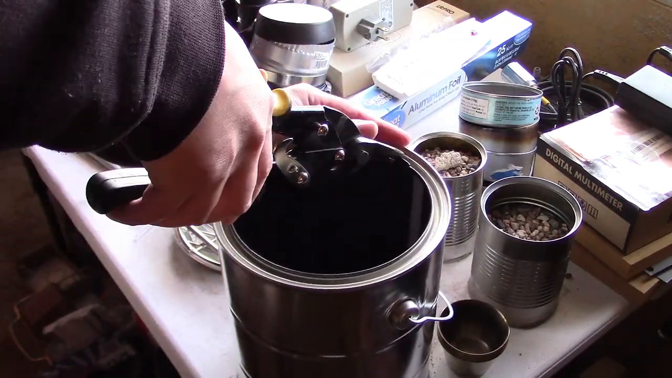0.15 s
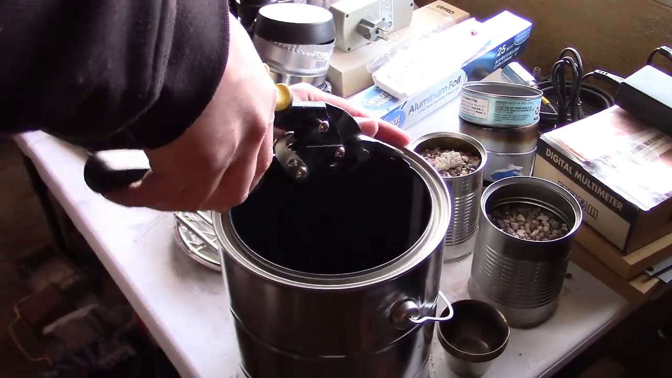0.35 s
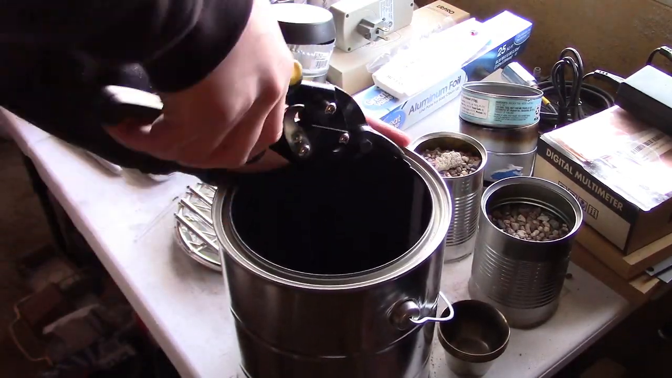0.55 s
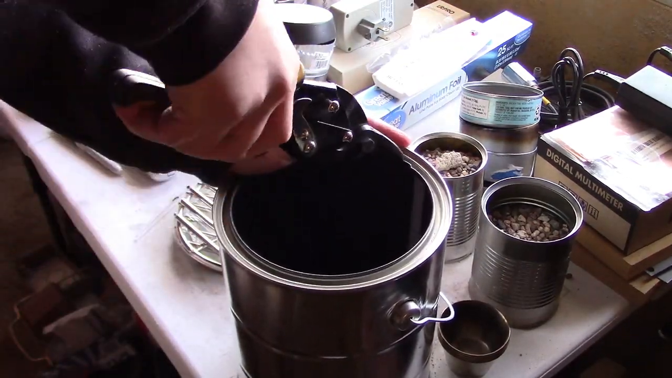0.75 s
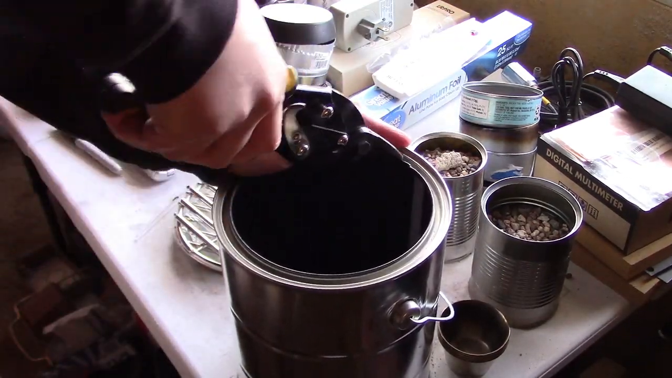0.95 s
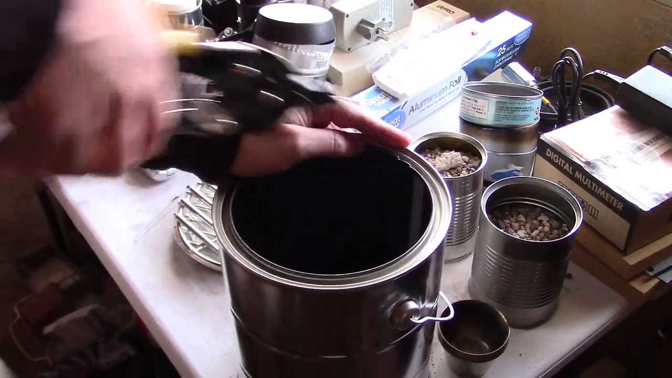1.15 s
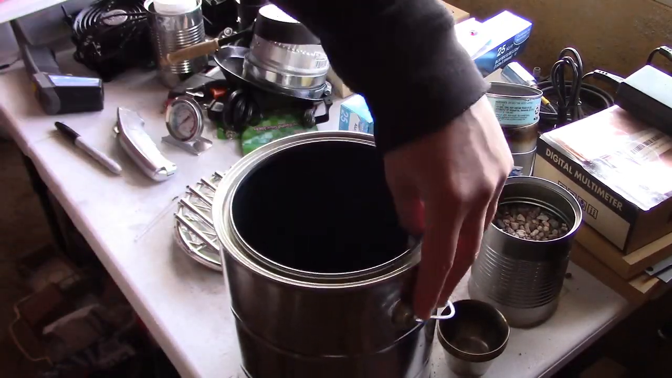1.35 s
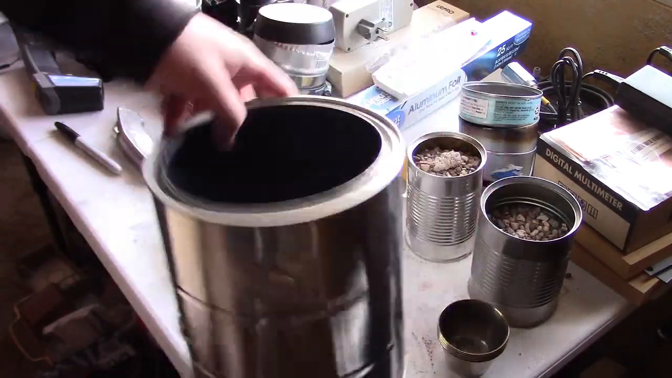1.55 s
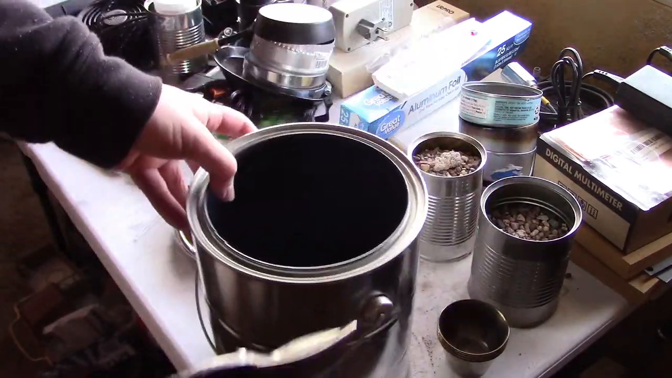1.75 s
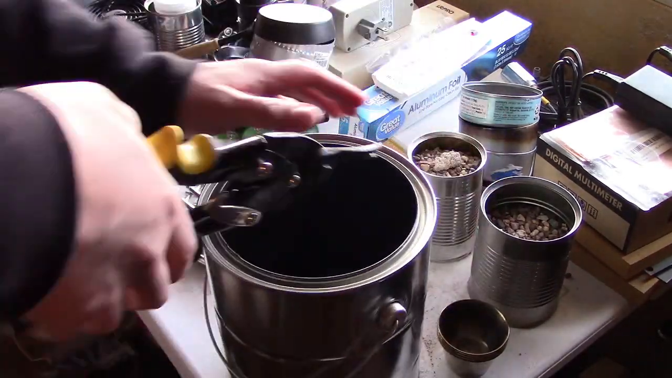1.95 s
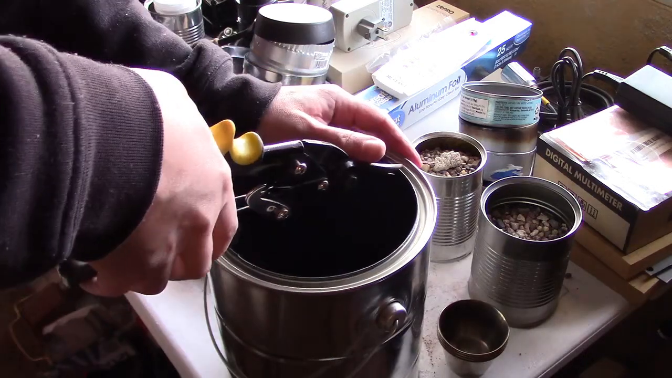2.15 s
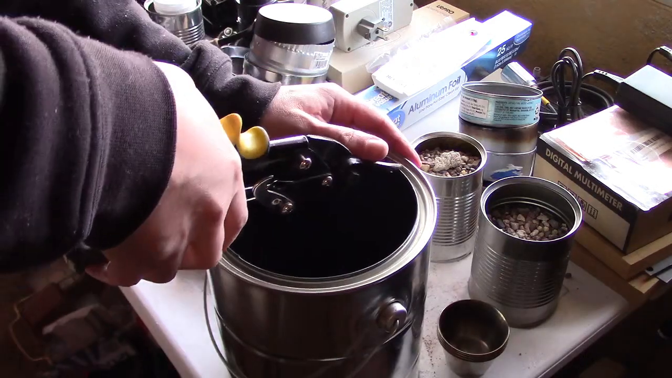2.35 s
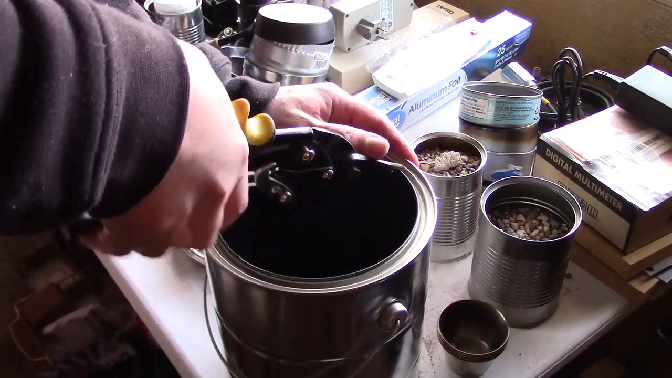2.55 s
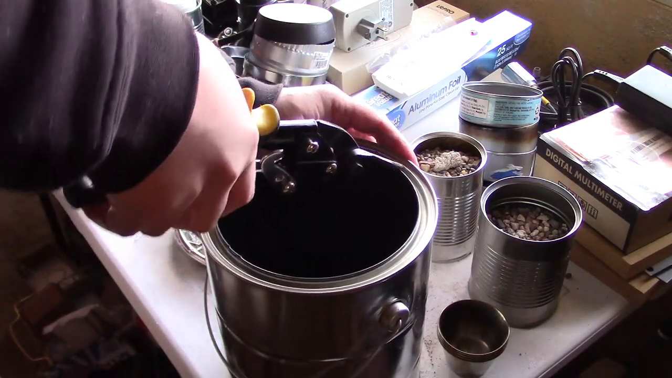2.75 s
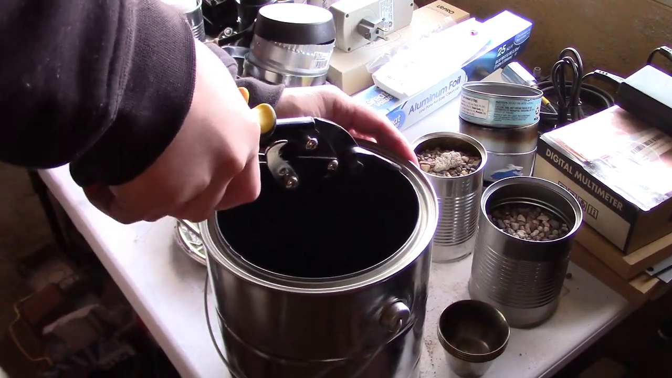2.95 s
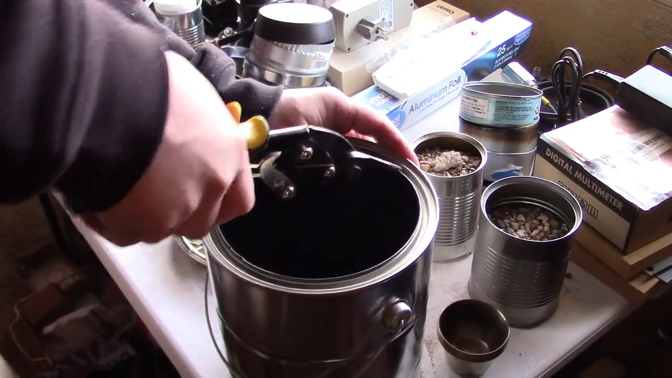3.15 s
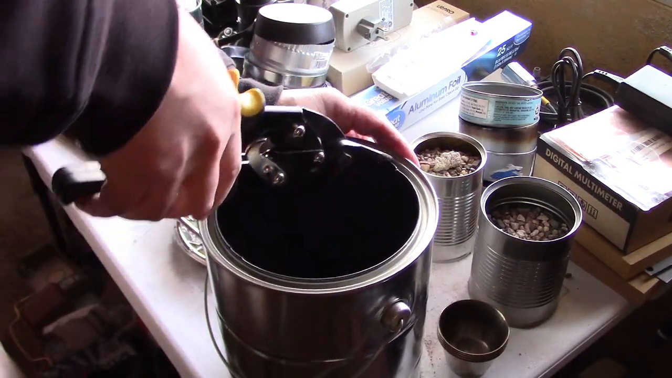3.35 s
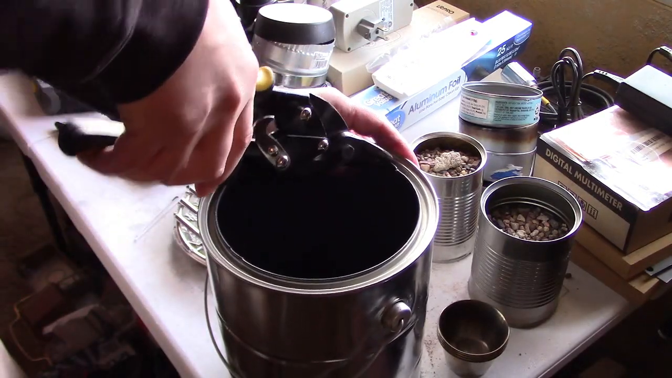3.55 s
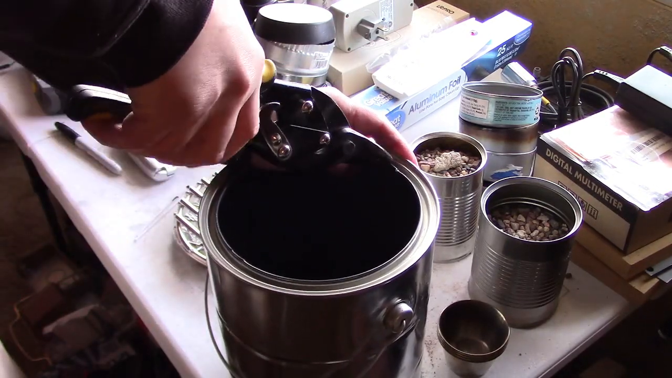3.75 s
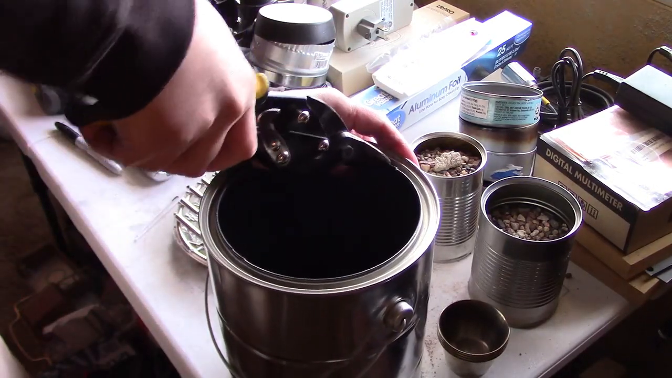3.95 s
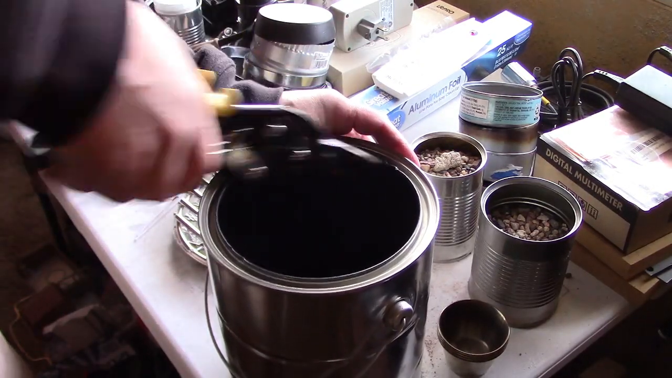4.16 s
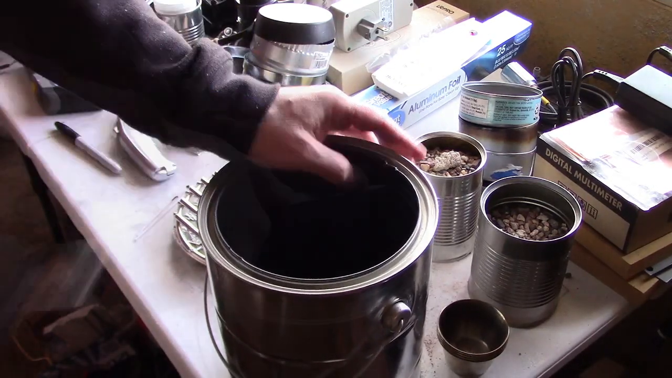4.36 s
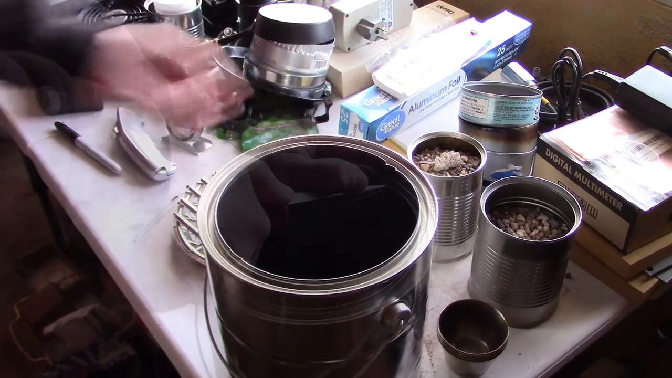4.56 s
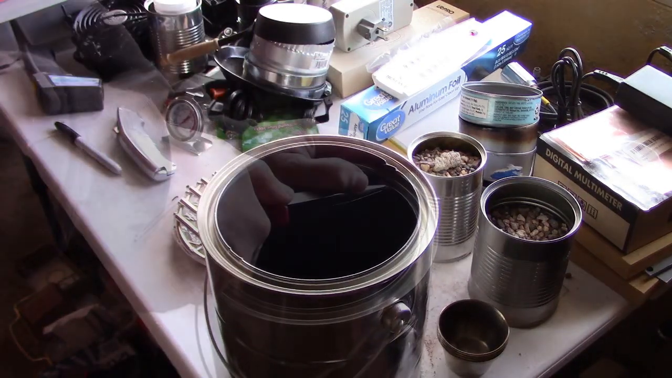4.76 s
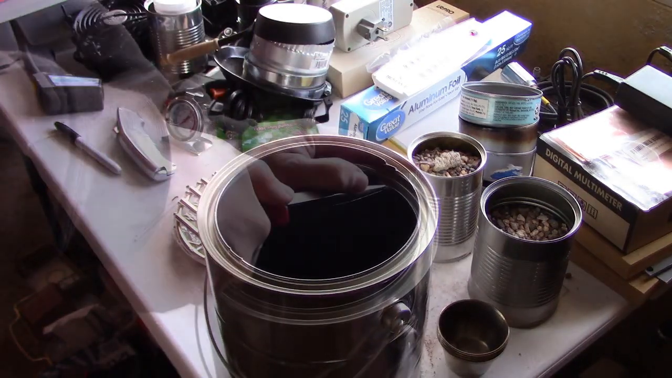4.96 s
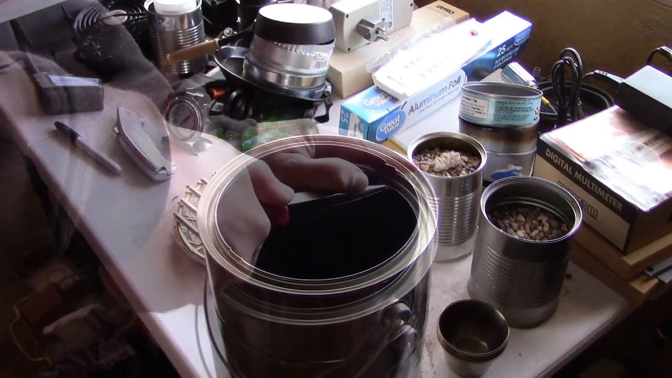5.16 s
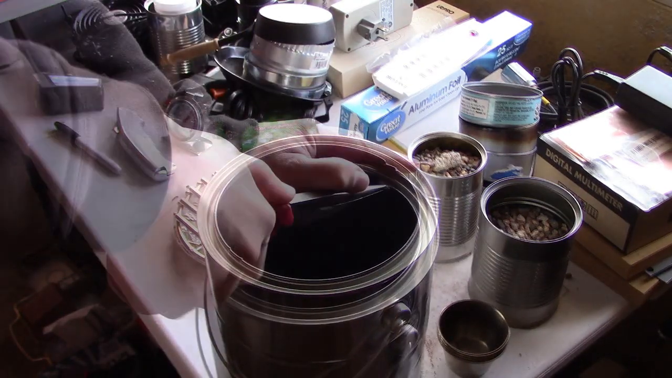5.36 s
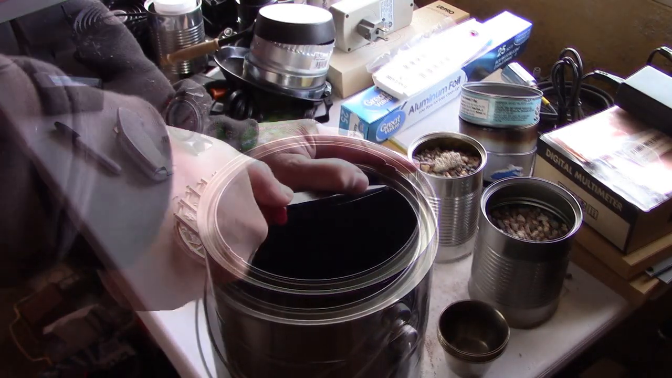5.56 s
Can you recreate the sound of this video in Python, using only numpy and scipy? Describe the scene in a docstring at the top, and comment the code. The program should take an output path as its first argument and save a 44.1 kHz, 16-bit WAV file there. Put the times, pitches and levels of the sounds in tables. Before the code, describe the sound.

Three bright steel cracks from hand snips dominate, each shaking the thin can wall and popping its bottom, with a lower rebound a moment later. The first comes early; the others come in the second half. Quiet ticks and duller jaw knocks surround them, ending in tiny touches. Low hum, soft airy hiss and a faint wavering hollow tone continue underneath, captured close with a narrow stereo image.

```python
"""Tin snips bite three times through the rim of an empty steel can on a workshop bench.
Each cut is a burst of filtered noise for the crack, plus decaying notes for the shaking wall and popping bottom.
Around the cuts the jaws knock and tick on the rim, shaking the same wall more gently.
Behind lie a faint hum, rush and hiss of shaped noise, and the can's hollow drone, a wavering sine.
The microphone pair stands close, so left and right are nearly alike."""
import sys
import numpy as np
from scipy.fft import rfft, irfft, next_fast_len
from scipy.io import wavfile
from scipy.ndimage import map_coordinates

SR = 44100
rng = np.random.default_rng(int(sys.argv[2]) if len(sys.argv) > 2 else 0)


def transcribe(signal):
    """Save signal, clipped to [-1, 1], as a 16-bit WAV file at the path in sys.argv[1]."""
    frames = np.atleast_2d(signal).T
    limited = np.clip(frames, -1, 1)
    pcm = np.round(limited * 32767).astype(np.int16)
    wavfile.write(sys.argv[1], SR, pcm)


N = 246959  # length of the scene in samples


def amp(db):
    """Turns decibels into a plain multiplier."""
    return 10 ** (np.asarray(db) / 20)


def unit(x):
    """Scales a sound to an rms of 1."""
    return x / np.sqrt(np.mean(x ** 2) + 1e-20)


def along(points, hz):
    """Reads a curve of (frequency, value) points, with straight lines on a log frequency axis."""
    f, values = np.transpose(points)
    return np.interp(np.log(hz + 1), np.log(f + 1), values)


def filtered(x, response):
    """Multiplies the spectrum of x by a response that depends on frequency."""
    n = x.shape[-1]
    padded = next_fast_len(n + 4096)
    spectrum = rfft(x, padded) * response(np.fft.rfftfreq(padded, 1 / SR))
    return irfft(spectrum, padded)[..., :n]


def wobble(rate):
    """A smooth random curve with `rate` random points a second."""
    points = rng.standard_normal(int(N * rate / SR) + 4)
    return map_coordinates(points, [np.arange(N) * rate / SR])


def add(out, start_s, sound):
    """Mixes a sound in at its start time."""
    out[:, round(start_s * SR):][:, :sound.shape[-1]] += sound


# how alike left and right are in the background: (frequency [Hz], likeness [-1 to 1])
LIKENESS = [(60, 0.96), (180, 1), (550, .98), (1650, 0.92), (4970, .84), (8500, .84), (10500, 0.94)]


def room_noise(gain):
    """Stereo noise of rms 1: the less alike the two ears, the more side signal is mixed in."""
    def mid_and_side(hz):
        angle = np.arccos(np.clip(along(LIKENESS, hz), -1, 1)) / 2
        return gain(hz) * [np.cos(angle), np.sin(angle)]

    mid, side = filtered(rng.standard_normal((2, N)), mid_and_side)
    return unit(np.array([mid + side, mid - side]))


# tone colours of the low hum, middle rush and high hiss: (frequency [Hz], relative level [dB])
HUM_COLOUR = [(15, -64.5), (25, -36.5), (71, -18), (112, -17.5), (178, -9), (229, -9), (283, -4),
              (318, -21), (350, -6), (409, -13), (515, -14), (701, -17), (954, -18), (2500, -65.5),
              (3250, -63), (5500, -120)]
RUSH_COLOUR = [(710, -27.5), (1200, -5.5), (1950, -11), (2310, -14), (6000, -24), (7800, -55),
               (13200, -120)]
HISS_COLOUR = [(2350, -27.5), (4000, -3), (5340, -6), (7760, -4.5), (11500, -10), (14000, -13.5),
               (15800, -24)]
# narrow bands in the hum: (centre [Hz], width at half amplitude [Hz], level against the broad hum [dB])
HUM_BANDS = [(186.2, 11, -8), (330, 14, -17), (385, 8, -15), (426.2, 11, -12.5), (511, 6.7, -15.5)]
# the can's hollow note, before its random wobble: (time [s], pitch [Hz], level [dB])
HOLLOW_NOTE = [(0, 290.7, -63.5), (1.05, 288.7, -49), (2.0, 287.7, -46.5), (2.6, 284, -50),
               (3.2, 279.2, -49.5), (3.701, 282.5, -49), (4.3, 274.6, -53.5), (5.6, 284.3, -51.5)]
# background treble, higher at first, dropping near 1.2 s, then rising and falling,
# before its random wobble: (time [s], level [dB])
TREBLE_LEVEL = [(0, -62.5), (.72, -64), (.97, -61.5), (1.12, -62), (1.25, -70.5), (1.8, -70), (2.5, -68.5),
                (2.68, -63.5), (3.1, -63.5), (3.8, -64.5), (4.12, -61), (4.33, -64.5), (4.73, -66.5),
                (4.92, -68.5), (5.12, -71), (5.6, -70.5)]
# hum and rush levels when the treble is at its quiet level, and their share of each dB above it
QUIET_DB, HUM_DB, RUSH_DB = -70, -48, -60.5
HUM_SHARE, RUSH_SHARE = 0.27, 0.7


def workshop():
    """Hum, rush and hiss are noise shaped by frequency; the air in the can drones as one wavering sine."""
    t = np.arange(N) / SR
    hiss_db = np.interp(t, *np.transpose(TREBLE_LEVEL))
    hum_db = HUM_DB + HUM_SHARE * (hiss_db - QUIET_DB)
    rush_db = RUSH_DB + RUSH_SHARE * (hiss_db - QUIET_DB)

    hum = room_noise(lambda hz: amp(along(HUM_COLOUR, hz)))
    for centre, width, db in HUM_BANDS:
        hum = hum + amp(db) * room_noise(lambda hz: 1 / np.abs(1 + 2j * (hz - centre) / width) ** 2)
    rush = room_noise(lambda hz: amp(along(RUSH_COLOUR, hz)))
    hiss = room_noise(lambda hz: amp(along(HISS_COLOUR, hz)))

    time_s, pitch_hz, level_db = np.transpose(HOLLOW_NOTE)
    pitch = np.interp(t, time_s, pitch_hz) + 2.8 * wobble(15)
    drone_level = amp(np.interp(t, time_s, level_db) + 1.1 * wobble(12))
    drone = drone_level * np.sin(2 * np.pi * np.cumsum(pitch) / SR)

    return (amp(hum_db + 0.46 * wobble(4.5)) * hum
            + amp(rush_db + 0.6 * wobble(7.6)) * rush
            + amp(hiss_db + 0.6 * wobble(11)) * hiss
            + drone)


# centres of the four tone zones, in order boom, clank, main and sizzle: [Hz]
ZONE_CENTRES = [370, 1250, 3700, 10000]


def zone_levels(boom_db, clank_db, sizzle_db):
    """The balance of one shake as a curve over frequency; the main zone is the 0 dB reference."""
    return list(zip(ZONE_CENTRES, [boom_db, clank_db, 0, sizzle_db]))


def fade(t, t60, damping):
    """Most of the ring dies early under the grip; a weaker free part lasts its full t60."""
    gripped = amp(-60 * t * max(damping, 0.5) / t60)
    free = amp(-12.5 - 60 * t / t60)
    return gripped + free


# free ring of the wall's close-packed modes: (frequency [Hz], time to fall 60 dB [s])
CROWD_RING = [(100, 0.33), (260, 0.33), (700, 0.38), (1840, 0.3), (4850, 0.25), (12800, 0.16)]
# their colour, read against its value at 3700 Hz: (frequency [Hz], level [dB])
CROWD_COLOUR = [(24, -65), (40, -28), (133, -25.5), (312, 8), (630, 0.5), (1090, -8.5), (1850, -14),
                (2150, -14), (2440, -13), (2700, -17.5), (3830, -17.5), (8990, -19), (16000, -22)]
# filter on their side signal: (frequency [Hz], gain [dB])
CROWD_WIDTH = [(40, -14), (150, -29.5), (700, -32), (1800, -34), (3000, -19), (7500, -22), (10500, -41)]


def crowded_modes(t, zones, damping):
    """Modes too close to tell apart sound like lumpy noise, dying band by band; returns mid and side."""
    centres = 40 * 2 ** (np.arange(18) / 2)  # half-octave bands, in Hz
    knots = rng.standard_normal(600)

    def tone(hz):
        bands = np.clip(1 - np.abs(2 * np.log2((hz + 1) / centres[:, None])), 0, 1)
        lumps = amp(3 * map_coordinates(knots, [hz / 90], mode="wrap"))  # modes gather in clusters
        colour_db = along(CROWD_COLOUR, hz) + along(zones, hz) - along(CROWD_COLOUR, 3700) - 3.0
        return bands * lumps * amp(colour_db)

    bands = filtered(rng.standard_normal((2, 1, len(t))), tone)
    mid, side = np.sum(bands * fade(t, along(CROWD_RING, centres)[:, None], damping), 1)
    # a random, grainy flutter of level that dies away
    grain = map_coordinates(rng.standard_normal(300), [500 * t])
    mid = mid * amp(2.1 * grain * amp(-60 * t / 0.28) - 1.0)
    return mid, filtered(side, lambda hz: amp(along(CROWD_WIDTH, hz)))


# clear notes of the wall: (pitch [Hz], relative level [dB], free time to fall 60 dB [s])
WALL_NOTES = [(526, -6, .22), (636, -5, .15), (780, -8, .2), (877, -14, .26), (1040, -13, .3),
              (1206, -13, .28), (1280, -7, .32), (1490, -13, .28), (1669, -12, .15), (1836, -12, .17),
              (1922, -21, .4), (2350, -11, .18), (2471, -8, .22), (2580, -10, .15), (2896, -12, .16),
              (2977, -12, .16), (3335, -12, .16), (3445, -12, .2), (3700, -14, .15), (3914, -12, .17),
              (4400, -12, .19), (4590, -13, .15), (5120, -13, .18), (5430, -13, .15), (5950, -13, .13),
              (6500, -13, .15), (7820, -14, .14), (8590, -15, .18), (9290, -13, .13), (10560, -12, .1)]


def clear_modes(t, zones, damping, lift_db, favoured):
    """The wall's separate notes as dying sines; the place of contact favours some of them."""
    hz, db, t60 = np.transpose(WALL_NOTES)[:, :, None]
    count = len(WALL_NOTES)
    detune, luck_db = rng.standard_normal((2, count, 1))
    chosen = np.isin(hz, [hz[np.argmin(np.abs(hz - note))] for note in favoured])
    # favoured notes take their own lift in place of the zone balance
    strength = amp(db - 13.5 + 2.5 * luck_db + np.where(chosen, lift_db, along(zones, hz)))
    # and they partly escape the grip
    ring = fade(t, t60, damping) + 0.21 * chosen * amp(-60 * t / t60)
    # a random flutter of level roughens each note
    where = np.broadcast_arrays(np.arange(count)[:, None], 60 * t)
    flutter = amp(3 * map_coordinates(rng.standard_normal((count, 40)), where))
    sines = np.sin(2 * np.pi * hz * (1 + 0.002 * detune) * t)
    return np.sum(strength * ring * flutter * sines, 0)


def shaken_wall(boom_db, clank_db, sizzle_db, rise_s, damping, lift_db, favoured):
    """One shake of the can wall: a noisy crowd of modes with clear notes above it."""
    t = np.arange(SR // 2) / SR
    zones = zone_levels(boom_db, clank_db, sizzle_db)
    mid, side = crowded_modes(t, zones, damping)
    mid = mid + clear_modes(t, zones, damping, lift_db, favoured)
    onset = 1 - np.exp(-t / max(rise_s, 1e-4))
    return onset * np.array([mid + side, mid - side])


# notes of the can's bottom and hollow: (pitch [x thump pitch], level [dB over thump], t60 [x thump t60])
BOTTOM_NOTES = [(.68, -12.5, 1.7), (1, 2.5, 1), (1.72, -12, 1.2)]


def thump(pitch_hz, db, t60):
    """Soft-edged low notes of the can's bottom, pitched by the grip."""
    t = np.arange(SR // 2) / SR
    notes = 0
    for ratio, level_db, longer in BOTTOM_NOTES:
        envelope = amp(db + level_db - 60 * t / (t60 * longer))
        notes = notes + envelope * np.sin(2 * np.pi * pitch_hz * ratio * t)
    return (1 - np.exp(-t / 0.004)) * notes


# light touches of jaws and fingers:
# (time [s], level [dB], clank [dB], sizzle [dB], favoured note [Hz])
LIGHT_TICKS = [(0.067, -47, -14, -9, 5120), (0.2273, -47.5, -17, 4.5, 9290), (0.4886, -41.5, -15, -1, 7820),
               (0.503, -41.5, -25, 4, 3914), (0.6248, -46, -6, -10, 3700), (2.4594, -52, -6, -5, 5430),
               (2.5848, -49, -4, 3, 10560), (2.6062, -36, -14.5, 3.5, 8590), (3.029, -44.5, -21, 9.5, 6500),
               (3.1472, -45, .1, -7, 3445), (3.4984, -51, 6, 1, 4400), (3.5798, -42, 2, 2.5, 4400),
               (3.7065, -47, -12, -11, 4400), (4.111, -48, -5, 6, 9290), (4.2906, -44.5, 2, 7.5, 10560),
               (4.4894, -47, 1.5, -15, 2471), (4.6831, -46.5, -13, 3.5, 8590), (4.702, -45.5, -16, 4, 3445),
               (4.7194, -49, -12, -.6, 5950)]
TICK_BOOM_DB, TICK_RISE_S, TICK_DAMPING, TICK_LIFT_DB = -15.5, 0.00055, 1.9, 6


def ticks():
    """Light contacts stir only the wall."""
    out = np.zeros((2, N + SR))
    for start_s, db, clank_db, sizzle_db, *favoured in LIGHT_TICKS:
        wall = shaken_wall(TICK_BOOM_DB, clank_db, sizzle_db, TICK_RISE_S, TICK_DAMPING,
                           TICK_LIFT_DB, favoured)
        add(out, start_s, amp(db) * wall)
    return out[:, :N]


# jaws knocking on the rim: (time [s], wall level [dB], clank [dB], sizzle [dB], thump pitch [Hz],
# thump level [dB], thump t60 [s], lift of favoured notes [dB], two favoured notes [Hz, Hz])
JAW_KNOCKS = [(0.7564, -11, -12, -11, 275, -10, 0.072, -6, 3335, 1280),
              (0.9807, -45, 9.5, -13, 291, -13.5, 0.038, 14, 6500, 5120),
              (1.029, -24.5, -3, -4, 315, -21, 0.045, -1, 3335, 1922),
              (1.0397, -25, -9, -9.5, 390, -30, .04, 11, 1490, 5430),
              (2.7869, -26, -6, -20.5, 277.6, -19.5, 0.17, 9.5, 1280, 2350),
              (3.186, -26, -3, -5.5, 343, -47, 0.043, 14, 1490, 6500),
              (3.1965, -27.5, -18, -8, 338, -38, .066, 13, 780, 1040),
              (4.096, -27.5, -11.5, -5.5, 229.5, -28.5, 0.15, 8.5, 4590, 5120),
              (4.2254, -30.5, 3, -6.5, 397, -42, .05, 5, 2580, 1490),
              (4.236, -51, -1.2, -22, 453, -28.5, 0.063, 8, 877, 1206)]
KNOCK_BOOM_DB, KNOCK_RISE_S, KNOCK_DAMPING = -10.5, 0.0019, 2.82


def knocks():
    """Firm contacts shake the wall and thump the bottom; a hand on the wall shortens the ring."""
    out = np.zeros((2, N + SR))
    for start_s, db, clank_db, sizzle_db, thump_hz, thump_db, t60, lift_db, *favoured in JAW_KNOCKS:
        wall = shaken_wall(KNOCK_BOOM_DB, clank_db, sizzle_db, KNOCK_RISE_S, KNOCK_DAMPING,
                           lift_db, favoured)
        add(out, start_s, amp(db) * wall + thump(thump_hz, thump_db, t60))
    return out[:, :N]


# resonances of the blades: (centre [Hz], width [Hz], level [dB])
BLADE_RESONANCES = [(3750, 550, 4.5), (8440, 3400, 0), (13250, 1200, -4)]


def blade_crack(crack_db):
    """Steel letting go: a noise burst of a few milliseconds, coloured by the blades' resonances."""
    def blades(f):
        return sum(amp(db) * 1j * f * width / (centre * centre - f * f + 1j * f * width)
                   for centre, width, db in BLADE_RESONANCES)

    t = np.arange(SR // 2) / SR
    burst = rng.standard_normal((2, len(t))) * amp(crack_db - 60 * t / 0.022)
    mid, side = filtered(burst, blades)
    return mid + amp(-22.5) * np.outer([1, -1], side)


# blades parting the rim: (time [s], level of wall and crack [dB], boom [dB], clank [dB], sizzle [dB],
# crack [dB], pop level [dB], rebound delay [s], rebound pitch [Hz], rebound level [dB],
# rebound t60 [s], lift of favoured notes [dB], four favoured notes [Hz, Hz, Hz, Hz])
RIM_SNAPS = [(0.7647, -5, -17.5, -9, -6, 4, -6, 0.016, 304, -18.5, 0.088, 4.5, 636, 526, 2471, 3700),
             (2.9178, -9.5, -11, -12.5, -4.5, 9.5, -5.5, .017, 341.5, -14, 0.095, 1.5, 780, 2350, 526, 2896),
             (3.8908, -7.5, -13.5, -10, -3.5, 5.5, -9, .023, 309.5, -10, 0.083, 8.5, 877, 1922, 2580, 2471)]
POP_HZ, POP_T60_S = 420, 0.042
RESHAKE_DB = -8  # second shake of the wall against the first


def snaps():
    """A bright crack; the wall shudders, the bottom pops, then springs back lower and shakes it again."""
    out = np.zeros((2, N + SR))
    for start_s, db, boom_db, clank_db, sizzle_db, crack_db, pop_db, *rest in RIM_SNAPS:
        rebound_s, rebound_hz, rebound_db, rebound_t60, lift_db, *favoured = rest
        balance = boom_db, clank_db, sizzle_db
        wall = shaken_wall(*balance, 0.0015, 1.2, lift_db, favoured)
        add(out, start_s, amp(db) * (wall + blade_crack(crack_db)))
        add(out, start_s, thump(POP_HZ, pop_db, POP_T60_S))
        wall_again = shaken_wall(*balance, 0.0022, 1.35, lift_db, favoured)
        rebound = thump(rebound_hz, rebound_db, rebound_t60)
        add(out, start_s + rebound_s, rebound + amp(db + RESHAKE_DB) * wall_again)
    return out[:, :N]


def scene():
    """Everything heard at once, from the background to the cuts."""
    return workshop() + ticks() + knocks() + snaps()


def record(dry):
    """Rounds off the loudest peaks towards 1.05 and fades the top out from 15800 to 16250 Hz."""
    soft = dry / (1 + np.abs(dry / 1.05) ** 6) ** (1 / 6)
    return filtered(soft, lambda hz: np.sin(np.pi / 2 * np.clip((16250 - hz) / 450, 0, 1)) ** 2)


dry = scene()
out = record(dry)
transcribe(out)
```